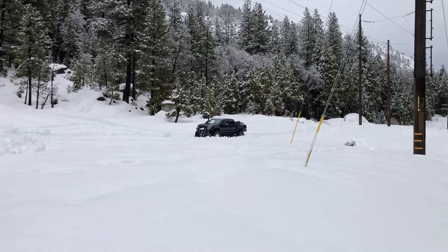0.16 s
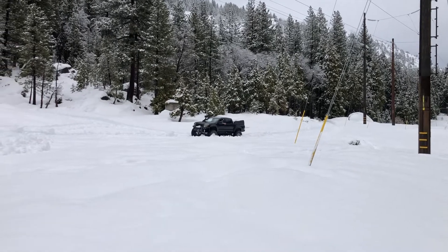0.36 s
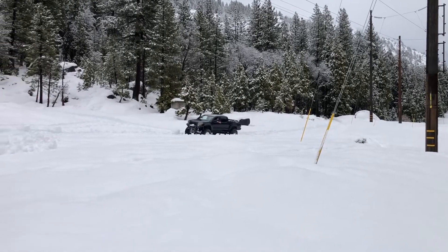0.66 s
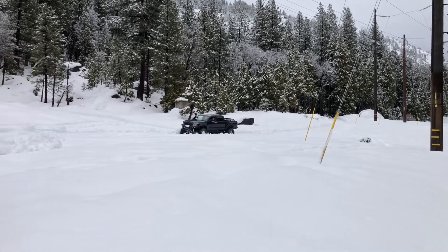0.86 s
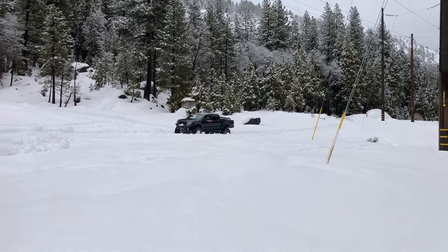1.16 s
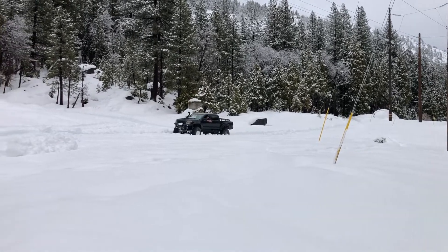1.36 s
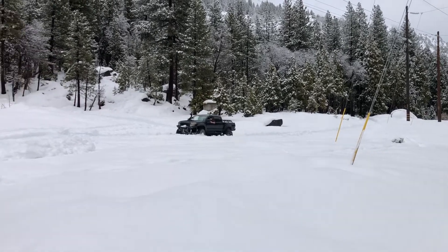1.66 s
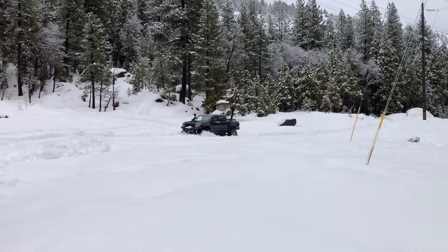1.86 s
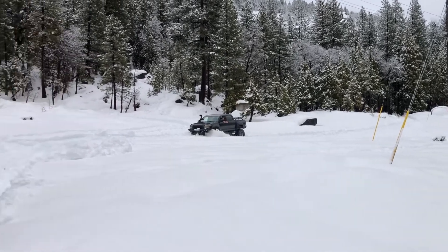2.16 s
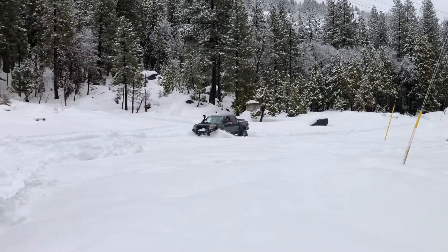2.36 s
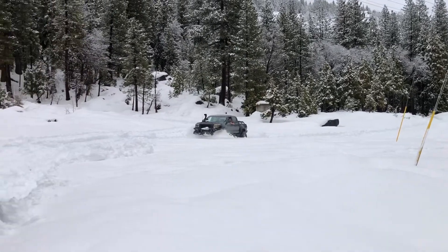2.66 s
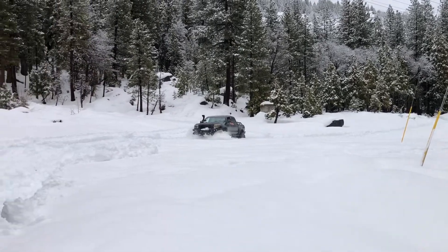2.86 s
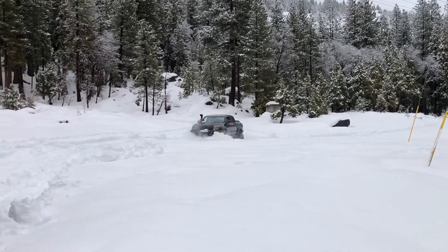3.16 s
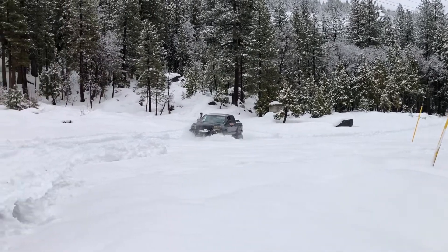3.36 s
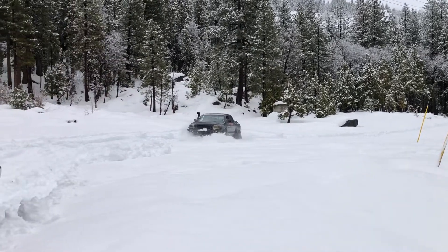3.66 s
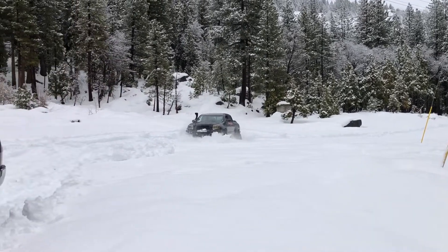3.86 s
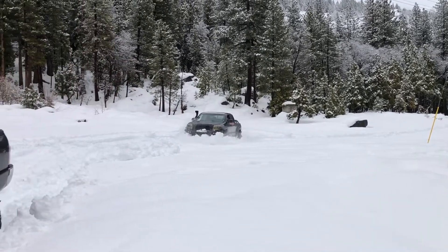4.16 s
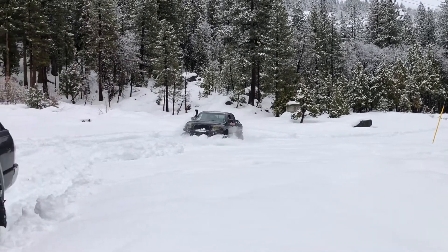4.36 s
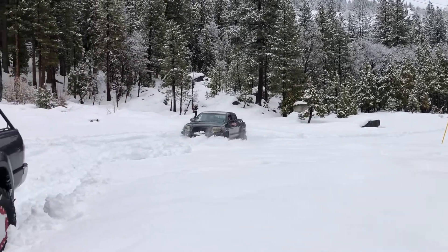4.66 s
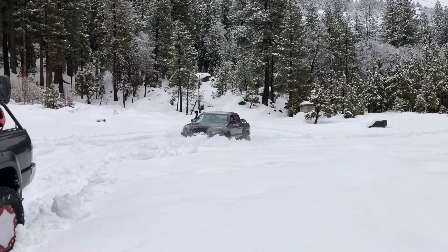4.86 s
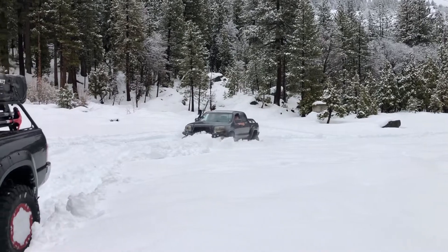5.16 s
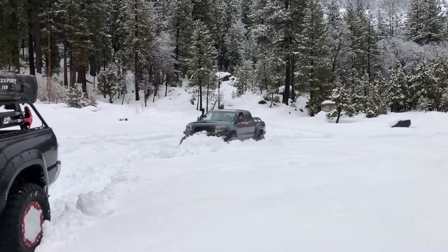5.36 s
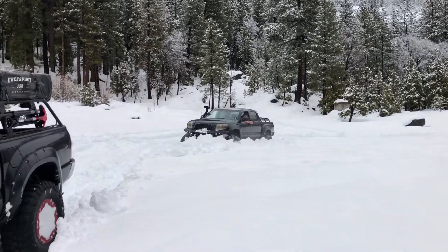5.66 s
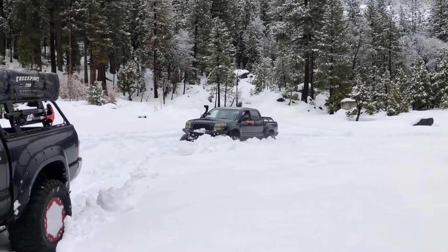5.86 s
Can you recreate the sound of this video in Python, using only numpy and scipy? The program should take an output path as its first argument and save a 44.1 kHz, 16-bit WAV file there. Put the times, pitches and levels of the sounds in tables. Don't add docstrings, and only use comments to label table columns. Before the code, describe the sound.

Across a snowy clearing, a six-cylinder truck revs up to its limiter, throttle dipping and exhaust cracking, snow spraying as it draws nearer.

```python
import sys
import numpy as np
from scipy import signal
from scipy.fft import rfft, irfft, next_fast_len
from scipy.io import wavfile
from scipy.ndimage import uniform_filter1d, map_coordinates

SR = 44100
rng = np.random.default_rng(int(sys.argv[2]) if len(sys.argv) > 2 else 0)


def magnitude_from_level(level_db):
    exponent = np.asarray(level_db, float) / 20
    return 10 ** exponent


def file_out(sig):
    cols = np.atleast_2d(sig).T
    lim = np.clip(cols, -1, 1)
    pcm = np.round(lim * 32767).astype(np.int16)
    wavfile.write(sys.argv[1], SR, pcm)


N = 265041
TIME = np.arange(N) / SR
STEP = 64
COAST_S = 5.82

# start in seconds, peak in dB, thump relative to it in dB,
# lift of that engine cycle in dB.
POPS = [(2.73, -14, -38, 2.5), (2.815, 0, -42, 5.5), (3.264, -5, -37, 4.5), (3.458, -4, -35, 3.5),
        (3.543, 0, -42, 5), (4.1, -15, -30.5, 1.5), (4.336, -5, -37.5, 5), (4.463, 7, -24, 4.5),
        (4.615, -3, -35.5, 4), (4.7, 8.5, -29, 4.5), (5.28, 1, -27, 4)]


def exhaust(cycles, drift_db, scatter_db):
    # time in seconds, level in dB.
    load = [(1.0, -62), (1.2, -46.5), (1.3, -43.5), (1.35, -35.5), (1.45, -33), (1.6, -30.5), (1.9, -27),
            (2.0, -23.5), (2.4, -22.5), (2.8, -20), (3.5, -19), (4.25, -15.5), (4.42, -17.5), (4.6, -19),
            (4.72, -16.5), (5.7, -16), (5.84, -26), (5.89, -40.5), (6.01, -42.5)]
    # multiple, level in dB.
    climb = [(1, -40.0), (2, -41), (3, -11.3), (4, -15.6), (5, -10), (6, 7), (7, -7), (8, -19), (9, -9),
             (10, -22), (11, -12.5), (12, -4), (13, -15.5), (14, -16), (15, -18), (16, -16), (17, -30),
             (18, -6), (19, -14.8), (20, -23), (21, -15), (22, -22), (23, -12), (24, -17), (25, -10),
             (26, -11.5), (27, -25), (28, -32), (29, -7.5), (30, -11)]
    # centre in Hz, width in Hz, gain in dB.
    pipe_modes = [(261, 25, 5.5), (391, 29, 6), (506, 106, 18.5), (586, 48, 4), (706, 56, 3.5),
                  (864, 89, 15), (1240, 130, 7)]
    # multiple, level in dB.
    full_pattern = [(1, -35), (2, -29), (3, -17), (4, -10), (5, -9), (6, 4), (7, -26), (8, -62.5), (9, -5),
                    (10, -9.5), (11, 3), (12, -3), (13, -31), (14, -17.5), (15, -32), (16, -60), (17, -0.5),
                    (18, -4), (19, -12.5), (20, -28), (21, -14.5), (22, -31), (23, -16), (24, -20),
                    (25, -41), (26, -15.5), (27, -14), (28, -15), (29, -11.5), (30, -17.5)]
    blend_hz = [44.6, 46.4]
    lift_hz = [288, 516, 870, 1350]
    lift_db = [0.2, 2.5, 2.8]
    lift_per_cut = [0.079, 0.52, -0.054]
    early_per_cut = [-0.69, 0.38, -0.18]
    shake = {3: -49.5, 4: -44, 5: -44, 9: -47, 11: -49}
    # time in seconds, gain in dB.
    nearing = [(1.2, -20.5), (2.3, -5), (2.9, -2), (4.3, 4.5), (5.8, 4), (6, -6.5)]
    coast_db = (5.5, -8, 13)
    wake_hz, muffled_db = 29, 3
    bank_keeps = 0.51

    t, hz, shut = TIME[::STEP], speed()[::STEP], cut_db()[::STEP]
    multiples, climb_db = np.transpose(climb)[:, :, None]
    rising = climb_db + sum(gain_db * np.exp(-((multiples * hz - centre) / width) ** 2)
                            for centre, width, gain_db in pipe_modes)
    rising -= rising.max(axis=0)
    settled = np.interp(hz, blend_hz, [0, 1])
    levels = (1 - settled) * rising + settled * np.transpose(full_pattern)[1][:, None]
    levels += curves(load)[0][::STEP] - shut - 10 * np.log10(np.sum(magnitude_from_level(2 * levels), axis=0) / 2)

    full = np.clip((hz - 44) / 2, 0, 1)
    coast = np.clip((t - COAST_S) / 0.0963, 0, 1)
    asleep_db = muffled_db * np.clip((wake_hz - hz) / 1.5, 0, 1)
    boom, bark, rasp = [full * db + (full * per + (1 - full) * early) * shut + coast * off - asleep_db
                        for db, per, early, off in zip(lift_db, lift_per_cut, early_per_cut, coast_db)]
    burn = burn_db(t, width=0.012)
    burn += scatter_db * wobble(45, size=STEP)
    late = cycles - 0.0028 * np.interp(TIME, t, burn)
    climbing = np.clip((45 - hz) / 6, 0, 1)

    sound = np.zeros(N)
    for k, row in zip(multiples[:, 0].astype(int), levels):
        in_boom, in_bark, in_rasp = [np.interp(k * hz, lift_hz, np.eye(len(lift_hz))[i]) for i in (0, 2, 3)]
        row = row + in_boom * boom + in_bark * bark + in_rasp * rasp
        if k == 9:
            row += bank_keeps * shut
        row += drift_db * (1 + climbing * k / 12) * wobble(9, size=STEP)
        row += burn * min(k / 17, 1.1)
        block = shake.get(k, -90) + np.interp(t, *np.transpose(nearing))
        row = block if k in (3, 4) else np.maximum(row, block)
        sound += partial(k, row, late, rough_db=0.15, spread=0.25)
    return sound


def partial(k, db, cycles, rough_db, spread):
    lag = [(5.5, 0), (9.5, .68), (10.5, .76), (11.5, .38), (17.5, .84), (23.5, 1.22)]
    db = db + rough_db * np.sqrt(k) * wobble(40, size=STEP)
    turn = 0.038 * np.sqrt(k) * wobble(25, size=STEP) + spread * rng.standard_normal()
    turn -= 2 * np.pi * np.interp(np.arange(k) + 0.5, *np.transpose(lag)).sum()

    def fine(values):
        return np.interp(np.arange(N), np.arange(0, N, STEP), values)

    return fine(magnitude_from_level(db)) * np.cos(2 * np.pi * k * cycles + fine(turn))


def speed():
    # time in seconds, engine cycles (two turns) in Hz.
    free_speed = [(1.0, 23.93), (1.28, 27.1), (1.36, 29.48), (1.55, 34.4), (1.7, 36.13), (2.04, 40.8),
                  (2.14, 43.3), (2.32, 45.36), (2.56, 46.24), (2.72, 47.04), (3.3, 47.08), (3.75, 46.92),
                  (4.85, 47.2), (5.03, 46.4), (5.27, 46.82), (5.47, 46.28), (5.72, 46.22), (6.01, 44.9)]
    stall_hz, stall_s = 0.03, 0.045
    sag_hz, sag_s = 0.42, 0.18
    delay = round(stall_s * SR)
    sag = sum(np.clip((TIME - s) / 0.031, 0, 1) * np.exp(-abs(TIME - s) / sag_s) for s, *_ in POPS)
    return curves(free_speed)[0] - stall_hz * np.pad(cut_db(), (delay, 0))[:N] - sag_hz * sag


def cut_db():
    # deepest moment in seconds, depth in dB, closing in seconds, reopening in seconds.
    cuts = [(1.63, 10, 0.063, .05), (1.92, 6.5, 0.11, 0.048), (2.18, 9, 0.098, 0.056),
            (2.49, 12.5, 0.088, 0.13), (2.91, 13, 0.087, 0.15), (3.34, 13, 0.055, .11),
            (3.67, 9, .11, 0.085), (4.06, 5, .13, 0.23), (4.95, 15.5, .1, 0.083), (5.42, 12.5, 0.17, 0.19),
            (5.84, 11.5, .14, 0.047)]
    return sum(db * np.clip(1 - np.maximum((s - TIME) / closing, (TIME - s) / opening), 0, 1)
               for s, db, closing, opening in cuts)


def burn_db(t, width):
    return sum(lift_db * np.exp(-((t - s - 0.006) / width) ** 2) for s, *_, lift_db in POPS)


def pops():
    thump, t = np.zeros(N + SR), np.arange(SR // 10) / SR
    push = np.sin(2 * np.pi * 88 * t) * np.sin(np.pi * np.minimum(t / 0.036, 1)) ** 2
    for s, db, thump_db, _ in POPS:
        thump[round(s * SR):][:len(t)] += magnitude_from_level(db + thump_db - 24) * push
    return thump[:N]


def machinery(cycles):
    # time in seconds, level in dB.
    block_level = [(0, -51), (1.2, -52), (1.55, -39.5), (2.3, -37), (2.75, -31.5), (4, -33), (5.8, -30),
                   (5.9, -35), (6.01, -36)]
    # frequency in Hz, density in dB per Hz.
    roar_colour = [(40, -60), (90, -12), (300, -4), (700, 3), (1300, 3), (2000, 2), (2500, -5.5),
                   (3200, -9), (4000, -17.5), (5000, -56)]
    # frequency in Hz, level in dB.
    whir = [(1500, -1), (1750, 3.5), (2000, 5), (2300, -0.5), (2600, -8), (3000, -1)]
    mesh = {37: 4, 43: 3.5, 53: 5}
    roar_per_cut, roar_per_burn = 0.36, 0.2
    hush_db = 1

    beat = 1 + 0.073 * np.cos(2 * np.pi * cycles) + 0.073 * np.cos(2 * np.pi * 6 * cycles)
    roar = coloured(beat * patchy(db=0.5), roar_colour)
    roar *= magnitude_from_level(-hush_db * np.clip((TIME - COAST_S) / 0.12, 0, 1))

    hz, lines = speed()[::STEP], np.zeros(N)
    for k in range(31, 64):
        line_db = np.interp(k * hz, *np.transpose(whir)) + mesh.get(k, 0) + 4.5 * wobble(2.6, size=STEP)
        lines += partial(k, line_db, cycles, rough_db=0.12, spread=1.5)
    fast = np.clip((TIME - 1.5) / 1.1, 0, 1)
    roar += magnitude_from_level(-1.5) * fast * unit(lines)

    roar_db = curves(block_level)[0] - roar_per_cut * cut_db() + roar_per_burn * burn_db(TIME, width=0.027)
    return roar * magnitude_from_level(roar_db + 0.6 * wobble(9))


def thrown_snow():
    # time in seconds, level in dB.
    thrown = [(0, -58), (.58, -55.5), (.94, -57), (1.25, -52.5), (1.52, -41), (1.7, -42.5), (2.11, -36.5),
              (2.46, -42), (3.2, -40), (3.7, -41.5), (4, -40), (4.4, -42), (4.62, -39.5), (5.06, -41),
              (5.34, -36.5), (5.57, -40), (5.78, -37), (5.92, -41.5)]
    # frequency in Hz, density in dB per Hz.
    spray_colour = [(1940, -3), (3300, -2.5), (4150, -5.5), (4790, -1), (5560, -2), (7130, -8), (9690, -7),
                    (11100, -14), (15100, -13.5), (15700, -12)]
    return magnitude_from_level(curves(thrown)[0] + 0.79 * wobble(12)) * coloured(patchy(db=1.3), spray_colour)


def trees(x, t60):
    t = np.arange(SR // 2) / SR
    tail = rng.standard_normal(len(t)) * magnitude_from_level(-60 * t / t60) * (t > 0.03)
    return signal.fftconvolve(x, tail / np.linalg.norm(tail))[:N]


def idling_truck():
    # frequency in Hz, density in dB per Hz.
    idle_colour = [(18, -39), (30, -16), (69, -11.5), (271, -2), (325, -4), (434, -9), (469, 0.5),
                   (660, -12), (1210, -18), (1530, -13), (1930, -3), (2200, -14), (2860, -7.5), (5650, -16),
                   (15700, -40)]
    # centre in Hz, width in Hz, level in dB.
    hum = [(470, 42, -15), (1220, 130, 1), (1590, 52, -12), (1830, 46, -7), (2030, 98, 0), (2814, 36, 1)]
    # time in seconds, gain in dB.
    fade = [(0, -1.5), (.6, -1), (.9, -3.5), (1.2, -1.5)]
    belts = unit(filtered(patchy(db=1.5), resonances(hum)))
    idle = coloured(patchy(db=1.0), idle_colour) + magnitude_from_level(-9) * belts
    return magnitude_from_level(-47.5 + curves(fade)[0]) * idle


def ground_rumble():
    # time in seconds, level in dB.
    ground = [(0, -61), (2.6, -57), (3.4, -55.5), (4.5, -53), (6.01, -50)]
    shudder_per_burn, shudder_s = 1.8, 0.05
    rumble = coloured(patchy(db=3.5), [(30, -28), (45, 2.5), (95, 6.5), (130, -1.5), (200, 0.5)])
    shudder_db = shudder_per_burn * burn_db(TIME, shudder_s)
    return magnitude_from_level(curves(ground)[0] + shudder_db + 1.2 * wobble(7.4)) * rumble


def unit(x):
    return x / np.sqrt(np.mean(x ** 2) + 1e-20)


def curves(rows):
    s, *cols = np.transpose(rows)
    return [np.interp(TIME, s, c) for c in cols]


def wobble(rate, size=1):
    knots = rng.standard_normal(int(N * rate / SR) + 4)
    return map_coordinates(knots, [np.arange(0, N, size) * rate / SR], order=1)


def filtered(x, response):
    m = next_fast_len(N + SR // 2)
    return irfft(rfft(x, m) * response(np.fft.rfftfreq(m, 1 / SR)), m)[:N]


def coloured(x, points):
    f, db = np.transpose(points)
    return unit(filtered(x, lambda hz: magnitude_from_level(np.interp(np.log(hz + 1), np.log(f + 1), db, -120, -120))))


def patchy(db):
    z = signal.stft(rng.standard_normal(N), nperseg=512)[2]
    field = uniform_filter1d(uniform_filter1d(rng.standard_normal(z.shape), 7, 0), 16, 1)
    return signal.istft(z * magnitude_from_level(db * unit(field)), nperseg=512)[1][:N]


def resonances(modes):
    return lambda f: sum((-1) ** i * magnitude_from_level(db) * 1j * f * w / (c * c - f * f + 1j * f * w)
                         for i, (c, w, db) in enumerate(modes))


def scene():
    cycles = np.cumsum(speed()) / SR
    running = np.clip((TIME - 0.95) / 0.12, 0, 1)
    pipe = running * exhaust(cycles, drift_db=1.6, scatter_db=-0.8) + pops()
    echo = magnitude_from_level(-23) * trees(pipe, t60=0.4)
    truck = pipe + echo + machinery(cycles) + thrown_snow()
    return (truck + idling_truck() + ground_rumble())[None]


def top_cut(x):
    return signal.sosfilt(signal.butter(12, 17000, fs=SR, output="sos"), x)


def record(dry):
    return top_cut(dry)


dry = scene()
out = record(dry)
file_out(out)
```